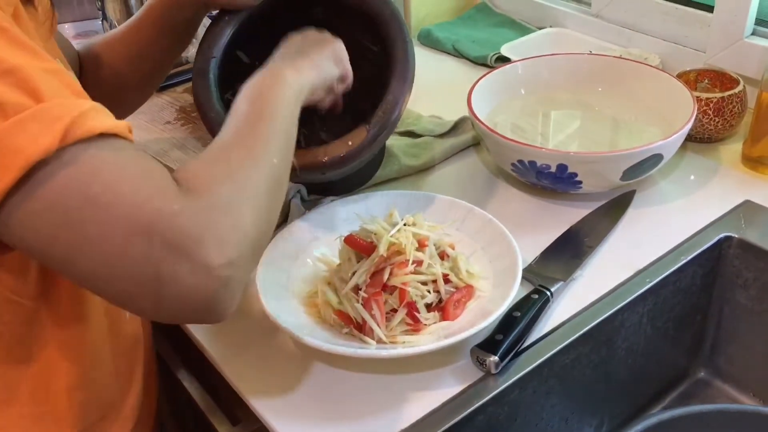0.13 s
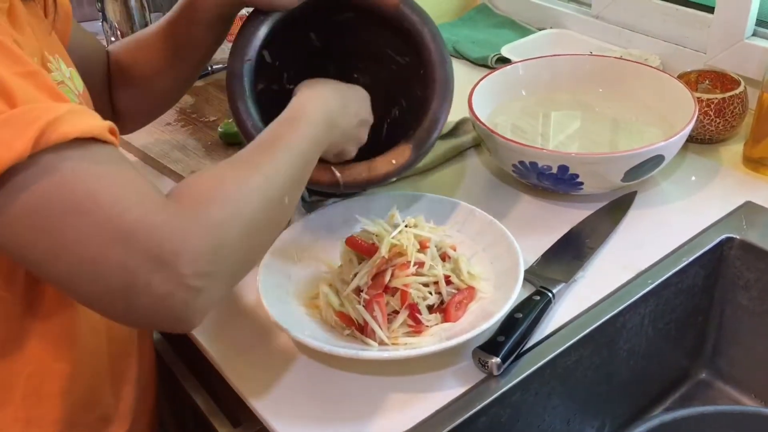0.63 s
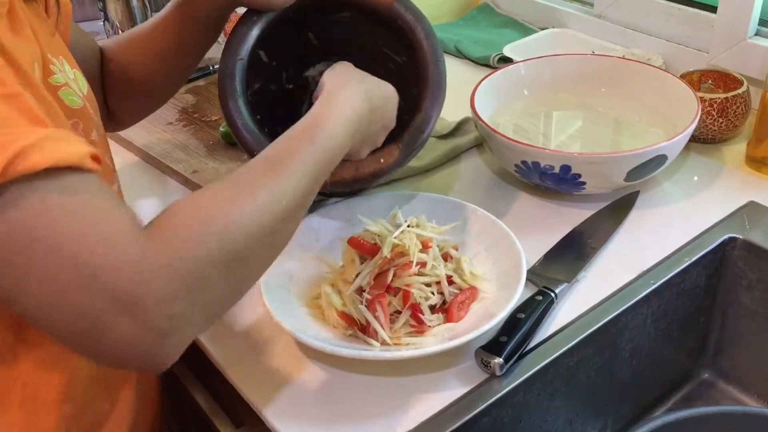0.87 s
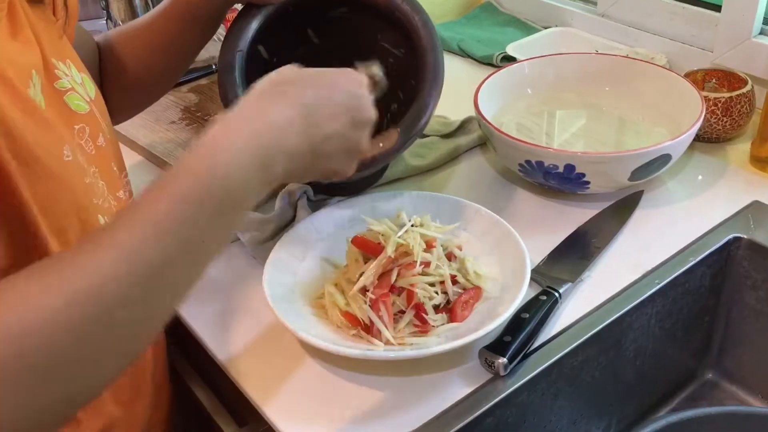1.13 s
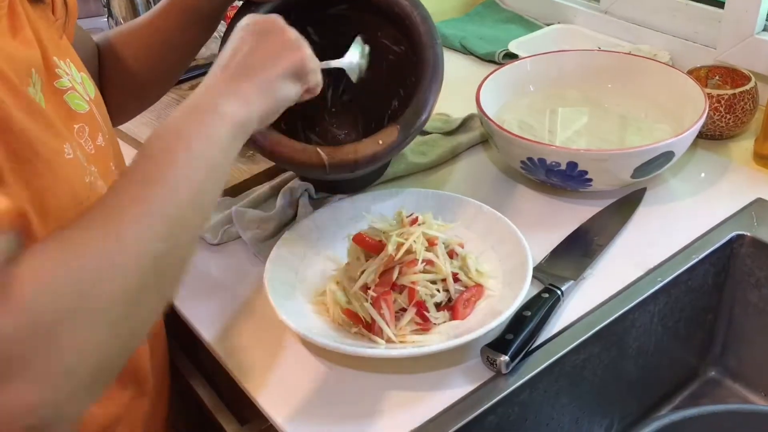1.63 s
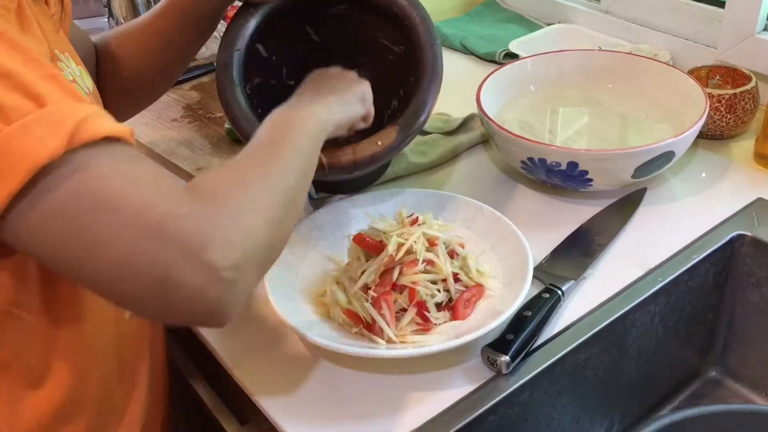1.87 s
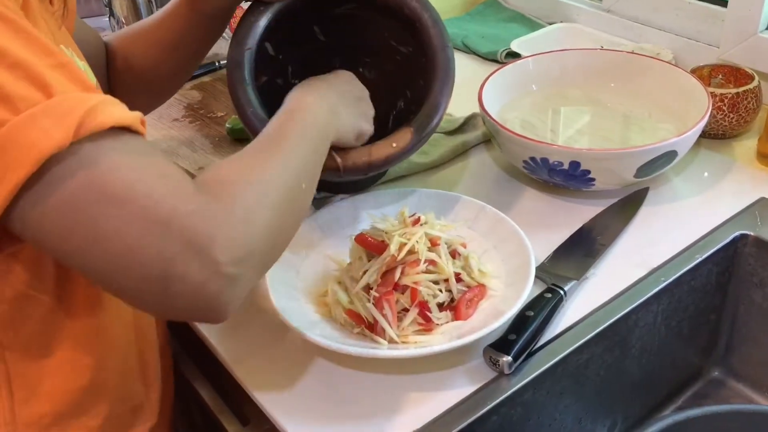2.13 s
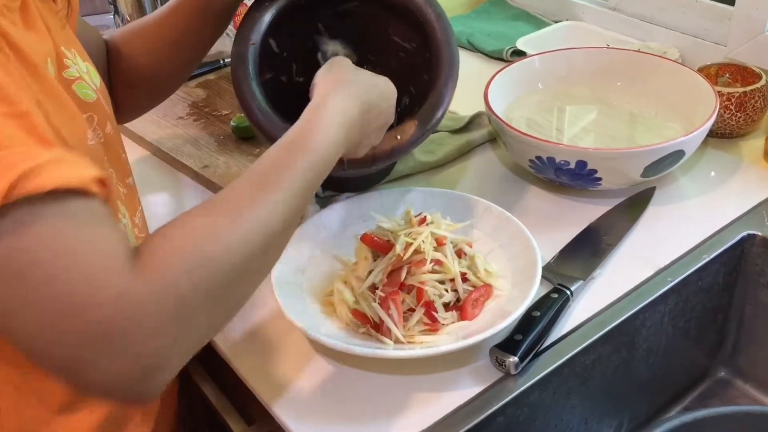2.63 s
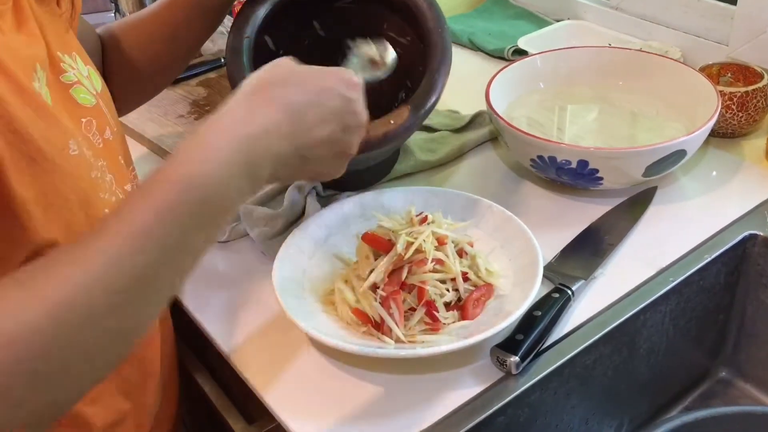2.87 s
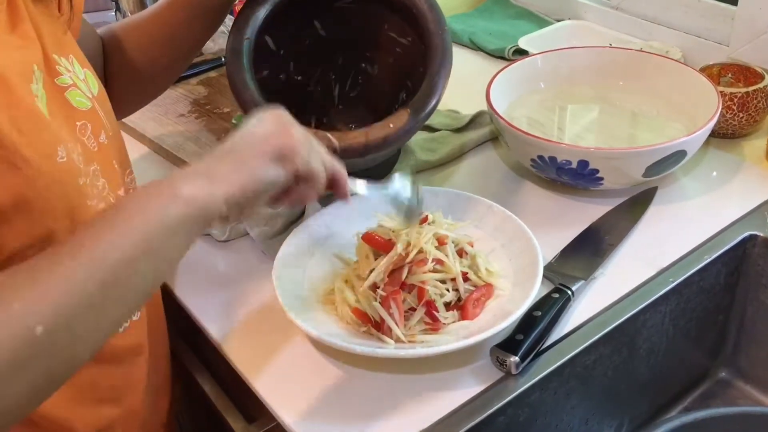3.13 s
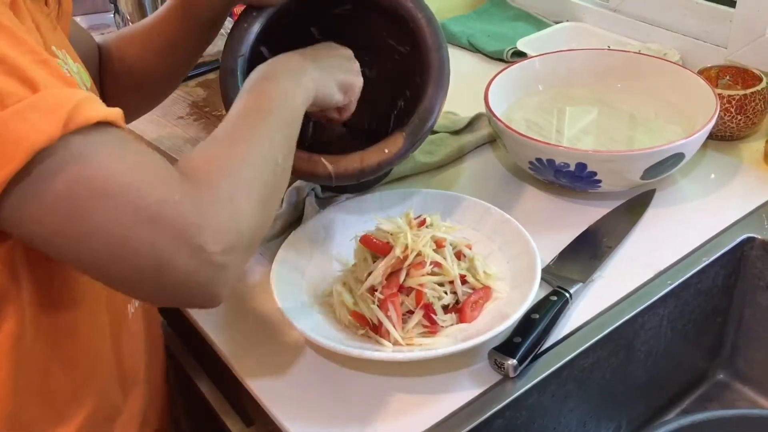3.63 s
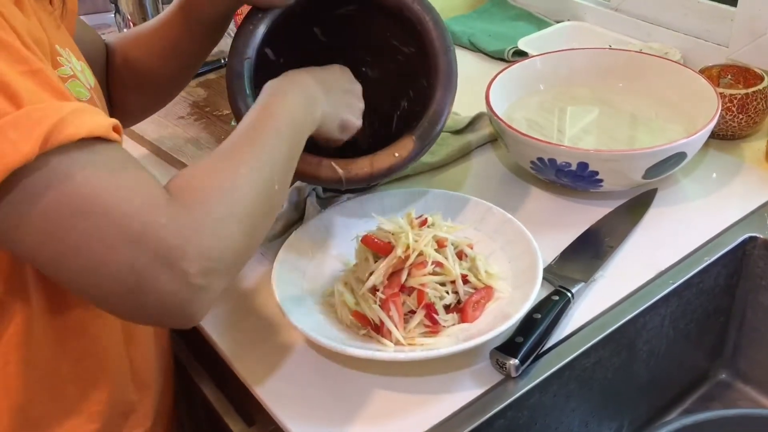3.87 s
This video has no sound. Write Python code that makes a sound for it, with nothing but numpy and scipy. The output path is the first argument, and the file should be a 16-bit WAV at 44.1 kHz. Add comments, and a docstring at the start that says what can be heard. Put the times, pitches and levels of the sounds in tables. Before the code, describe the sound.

A metal spoon rubs, then knocks and scrapes quickly inside a clay mortar, falls nearly silent, strikes brightly with more scraping, pauses, then hits hard again; small kitchen, low hum, close microphone, same in both channels.

```python
"""A metal spoon knocks against and scrapes along the wall of a clay mortar in a small quiet kitchen.
Over a steady appliance hum it first rubs, then knocks and scrapes in quick turn. After a lull come a faint rub,
a bright blow at 1.9 s with more knocks and rubbing, a pause, then a hard blow at 3.57 s and scraping up to 4 s.
Blows ring damped modes of spoon, clay and hollow; random grains ring the same modes and hiss as grit."""
import sys
import numpy as np
from scipy import signal
from scipy.fft import rfft, irfft
from scipy.io import wavfile

SR = 44100
rng = np.random.default_rng(int(sys.argv[2]) if len(sys.argv) > 2 else 0)


def volts_from_db(level):
    """Convert decibel levels to linear amplitude ratios."""
    exponent = np.asarray(level, float) / 20
    return 10 ** exponent


def transcribe(u):
    """Save the signal u as a 16-bit wav file named by the first command-line argument.

    u: samples, shape (n,) or (channels, n), limited to [-1, 1]; the rate is SR.
    q: integer samples, one column per channel.
    """
    v = np.clip(np.atleast_2d(u).T, -1, 1)
    q = np.round(v * 32767).astype(np.int16)
    wavfile.write(sys.argv[1], SR, q)


N = 176400

# Mortar modes. Each row: pitch in Hz, relative level in dB, undamped t60 in seconds.
MORTAR_MODES = [(1460, -4, 0.035), (1810, -8, 0.021), (2222, -5, 0.04), (2330, -4, 0.03), (2510, -3, .03),
                (2715, -3.5, .03), (2870, -4, 0.03), (3090, -3.5, .03), (3400, -5, .02), (3720, -1.5, 0.02),
                (4150, -6, .02), (5230, -13, .02), (6200, -7, .025)]


def rms_one(x):
    """Scale to rms 1."""
    return x / np.sqrt(np.mean(x ** 2) + 1e-20)


def cut(x, hz, kind):
    """Second-order Butterworth low-, high- or band-pass design."""
    return signal.sosfilt(signal.butter(2, hz, kind, fs=SR, output="sos"), x)


def wander(hz):
    """Chance low-passed at hz, rms 1."""
    return rms_one(cut(rng.standard_normal(N), hz, "low"))


def quiet_air():
    """Kitchen air: white noise shaped in frequency, interpolated over log pitch."""
    level_db = -57
    # Noise spectrum. Each row: frequency in Hz, relative density in dB per Hz.
    air_curve = np.array([(65, -28.5), (110, -6.5), (233, -12.5), (346, -11.5), (483, -19.5), (536, -14.5),
                          (595, -18), (674, -18), (1520, -27), (2080, -35), (7400, -45.5), (16000, -51)])
    hz = np.maximum(np.arange(N // 2 + 1) * SR / N, 1)
    shape = volts_from_db(np.interp(np.log(hz), np.log(air_curve[:, 0]), air_curve[:, 1]))
    return volts_from_db(level_db) * rms_one(irfft(rfft(rng.standard_normal(N)) * shape, N))


def appliance_hum():
    """Appliance tones: narrow bands of noise, their level swings compressed to the square root."""
    # Each row: pitch in Hz, level in dB rms, full width at half amplitude in Hz.
    hum_rows = [(49.6, -54, 17), (61.2, -52, 0.38), (83.9, -62.5, 9), (98, -58, 7.9), (294, -64, 19),
                (345.4, -67.5, 4.2), (1535, -74, 3.22), (7320, -89, 36)]
    hz = np.maximum(np.arange(N // 2 + 1) * SR / N, 1)
    out = np.zeros(N)
    for tone_hz, db, width_hz in hum_rows:
        line = 1 / (1 + ((hz - tone_hz) / width_hz * 2) ** 2)
        analytic = signal.hilbert(irfft(rfft(rng.standard_normal(N)) * line, N))
        out += volts_from_db(db) * rms_one(np.imag(analytic) / np.abs(analytic) ** 0.5)
    return out


def kitchen(x):
    """Diffuse room tail: dying noise, the treble dying sooner."""
    tail_db, split_hz, rise_s = -14, 2730, 0.005
    low_t60_s, high_t60_s, high_db = 0.48, 0.22, -5.5
    t = np.arange(SR * 3 // 4) / SR
    noise = rng.standard_normal((2, len(t)))
    low = cut(noise[0], split_hz, "low") * volts_from_db(-60 * t / low_t60_s)
    high = cut(noise[1], split_hz, "high") * volts_from_db(high_db - 60 * t / high_t60_s)
    tail = (low + high) * np.clip(t / rise_s, 0, 1) ** 2
    return volts_from_db(tail_db) * signal.fftconvolve(x, tail / np.sqrt(np.sum(tail ** 2)))[:N]


def wall_ring():
    """A close pair of wall modes in opposite phase: the tone swells, dips and returns fainter."""
    ring_hz, split_hz, t60_s = 1168, 8.8, 0.34
    # Each row: start in seconds, level in dB before beat and decay.
    ring_rows = [(0.0, -53), (1.89, -44), (3.565, -25)]
    out = np.zeros(N)
    for s, db in ring_rows:
        t = np.maximum(np.arange(N) / SR - s, 0)
        beat = np.sin(np.pi * split_hz * t)
        out += volts_from_db(db - 60 * t / t60_s) * np.sin(2 * np.pi * ring_hz * t) * beat
    return out


def singing():
    """Single modes of spoon or mortar left free: sines dying away, fluttering under the grip."""
    flutter_depth_db, flutter_hz = 3.5, 45
    # Each row: start in seconds, pitch in Hz, starting level in dB before flutter, t60 in seconds.
    sing_rows = np.array([(0.0, 2130, -57.5, 0.4), (0.0, 3060, -53.5, 0.27), (0.0, 3390, -54, 0.22),
                          (.206, 3388, -44.5, 0.78), (1.8945, 3403, -24, 0.15), (2.156, 2830, -35, 0.12),
                          (2.156, 2340, -52, .25), (3.5655, 4963, -32.5, 0.2), (3.5655, 7200, -28, 0.11)])
    s, hz, db, t60 = sing_rows.T[:, :, None]
    t = np.maximum(np.arange(N) / SR - s, 0)
    flutter_db = flutter_depth_db * np.array([wander(flutter_hz) for _ in sing_rows])
    return np.sum(volts_from_db(db + flutter_db - 60 * t / t60) * np.sin(2 * np.pi * hz * t), axis=0)


def squeaks():
    """The edge catches and one band of spoon or hollow swells: narrow noise under a half-sine."""
    width = 0.07  # share of the pitch
    # Each row: start in seconds, length in seconds, pitch in Hz, level in dB rms before the swell.
    squeak_rows = [(0.221, .018, 5620, -41), (0.276, 0.028, 4670, -39.5), (.297, 0.036, 6070, -36.5),
                   (0.495, 0.034, 555, -47), (2.095, .12, 495, -51), (0.667, 0.048, 7060, -60),
                   (1.962, 0.041, 6250, -46), (3.7, 0.035, 9600, -47), (3.728, 0.035, 5970, -40.5),
                   (3.941, 0.013, 6130, -43.5)]
    out = np.zeros(N)
    for s, length_s, hz, db in squeak_rows:
        noise = rng.standard_normal(SR // 5)
        swell = np.sin(np.pi * np.clip(np.arange(len(noise)) / SR / length_s, 0, 1))
        band = cut(noise, [hz * (1 - width / 2), hz * (1 + width / 2)], "band")
        wave = volts_from_db(db) * swell * rms_one(band)
        start = int(s * SR)
        out[start:start + len(noise)] += wave[:N - start]
    return out


def spoon_modes():
    """Spoon modes as rows of pitch in Hz, relative level in dB, undamped t60 in seconds."""
    # One pitch in Hz per mode.
    spoon_pitches_hz = [3230, 3385, 3505, 3750, 4000, 4500, 4680, 4963, 5730, 5912, 6130, 6610, 7100, 8200,
                        8825, 9200, 10100, 11700, 12730, 13540, 14310, 15200]
    # Each row: relative level in dB, undamped t60 in seconds.
    spoon_decays = [(-1.5, 0.035), (6, 0.054), (-3.5, 0.076), (-3.5, 0.062), (-3.5, 0.029), (-6, 0.081),
                    (-16, .08), (-13.5, .16), (-4, .07), (-2.5, 0.079), (-5, 0.092), (-7.5, 0.12),
                    (-11, 0.044), (-14, 0.046), (-4, 0.076), (-5.5, 0.049), (-26.5, 0.018), (-20, 0.025),
                    (-3, 0.056), (-13.5, 0.046), (-10.5, 0.033), (-18, .04)]
    return [(hz, db, t60) for hz, (db, t60) in zip(spoon_pitches_hz, spoon_decays)]


def rubbed(modes, low, high, damping, grains, shift_percent):
    """Grains into one group's resonators, each drifting in pitch and fading on its own; rms 1."""
    pitch_wander_percent, pitch_wander_hz = 0.45, 10  # contact and grip pull the modes about
    level_wander_db, level_wander_hz = 5, 12
    treble_damp_hz = 10000  # above this a mode broadens fast
    out = 0
    for hz, db, t60 in modes:
        if low <= hz < high:
            bend = 1 + (shift_percent + pitch_wander_percent * wander(pitch_wander_hz)) / 100
            turn = np.exp(2j * np.pi * hz / SR * np.cumsum(bend))
            r = volts_from_db(-60 * (1 + (hz / treble_damp_hz) ** 2) / (t60 * damping * SR))
            push = grains * volts_from_db(db + level_wander_db * wander(level_wander_hz))
            # one-pole decay in a frame turning at the mode's pitch
            out = out + np.real(turn * signal.lfilter([1], [1, -r], push / turn + 1e-18))
    return rms_one(out)


def rub_grains():
    """Sparse random impulses of uneven size with a slight level flutter."""
    grains_per_s, flutter_db, flutter_hz = 5500, 0.5, 61.4
    hits = rng.random(N) < grains_per_s / SR
    return volts_from_db(flutter_db * wander(flutter_hz)) * hits * rng.standard_normal(N)


def rubbing():
    """Dense grains under each stroke excite the modes of both bodies and hiss as grit."""
    touch_s, lift_s = 0.006, 0.003  # fade in and out of a stroke
    spoon_damping = 0.6  # share of the spoon's t60 left in contact
    # One list per stroke; the point of contact decides which groups speak. Each row: time in seconds,
    # spoon level in dB in four groups low to high, mortar level in dB in two groups low to high.
    stroke_rows = [
        [(0.0, -40, -42, -68, -58, -40, -33), (0.012, -49.5, -55, -60, -66, -64, -57),
         (0.116, -68, -69.5, -69, -78, -67, -64), (0.156, -69, -74, -80, -87, -73, -89),
         (0.194, -77, -75, -63, -77, -72, -86), (0.196, -67, -64, -47, -63, -67.5, -79)],
        [(0.203, -40, -41.5, -30.5, -44, -53, -67), (0.234, -44.5, -38, -49, -41, -69, -70),
         (0.248, -44, -65, -43, -62, -69, -72), (0.272, -48, -50, -48, -51, -68, -73),
         (0.284, -38, -39, -40.5, -42, -60, -66), (0.292, -46, -46, -40, -55, -63, -67),
         (0.314, -36, -40, -55, -50, -54, -53), (0.334, -60, -79, -48, -50, -53, -57),
         (0.338, -47, -51, -61.5, -57, -55, -65)],
        [(0.355, -43, -37, -63.5, -63, -56, -60), (0.366, -45, -54, -68, -71, -76, -47.5),
         (0.434, -57, -60.5, -85, -85, -91, -55.5), (0.468, -60, -64, -85, -76, -63, -67),
         (0.476, -53.5, -65, -57, -69, -57, -59), (0.492, -53, -60, -63, -65, -64, -57),
         (0.518, -36, -51, -38, -52, -44, -44.5), (0.521, -50, -46, -57.5, -47.5, -45, -35)],
        [(0.53, -41, -57, -48, -50, -40, -28), (0.549, -51, -61, -58, -70, -68, -40.5),
         (0.591, -54, -65, -59, -64, -80, -47), (0.633, -59, -69, -72, -81, -79, -56),
         (0.663, -70, -70, -86.5, -75, -82, -57), (0.683, -60, -60, -63.5, -68, -85, -59),
         (0.761, -75, -70.5, -67, -76, -86, -70.5), (0.83, -76, -76, -77, -79, -92, -78)],
        [(1.364, -83, -83.5, -73, -80, -85, -79), (1.414, -95, -84, -99, -87, -81, -92),
         (1.428, -84, -79, -71, -76, -89, -88), (1.46, -95.5, -96, -87, -94.5, -71, -84)],
        [(1.9, -29, -24, -40, -45, -39, -50), (1.922, -39, -37, -40, -50, -50, -53),
         (1.938, -35.5, -41, -44, -53, -60, -47), (1.972, -36.5, -35.5, -41.5, -52, -48.5, -50),
         (1.994, -46, -53, -54, -63, -58, -55), (2.02, -45, -50, -61, -70, -62, -80),
         (2.032, -53, -50, -65, -68, -60, -47), (2.04, -46, -49, -59, -56, -63, -58)],
        [(2.07, -40, -49, -62, -61, -41, -47), (2.076, -53, -60, -68, -71, -60, -50),
         (2.134, -60, -62, -76, -75, -64, -57.5), (2.148, -53, -52, -52, -61, -57, -55),
         (2.17, -50.5, -64, -53, -52, -42.5, -42), (2.24, -62, -64, -66, -70, -88, -57),
         (2.29, -68, -70, -71, -74, -62, -63.5), (2.36, -85, -87, -91, -88, -89, -70.5)],
        [(2.37, -79, -77, -80, -75.5, -73.5, -74), (2.428, -78, -80, -75, -78, -83, -77),
         (2.458, -74, -71, -67, -65, -83, -70), (2.474, -80, -73, -66, -65, -82, -79),
         (2.494, -75, -72, -73, -75, -82, -84), (2.53, -80, -77, -72, -71, -84, -88),
         (2.57, -85.5, -90.5, -91, -88, -78.5, -86)],
        [(3.58, -38, -41, -31, -53, -32, -36), (3.597, -38, -36, -40, -51, -53, -46.5),
         (3.689, -44, -49, -50.5, -60, -56, -53), (3.701, -59, -46, -48, -46, -50, -49),
         (3.725, -41.5, -45, -51, -59, -62.5, -59.5), (3.867, -63, -65, -71, -79, -65.5, -65),
         (3.893, -59, -60, -76, -59, -59, -64), (3.933, -62, -75, -68, -80, -68, -65),
         (3.94, -55, -58, -63, -62, -58, -61)],
        [(3.955, -49, -62, -62, -64.5, -37, -42), (3.969, -46, -62, -51, -56, -38.5, -41),
         (3.975, -55, -57, -49, -58, -40, -42), (3.991, -44, -69, -50, -41, -35.5, -32.5),
         (4.0, -48, -48, -51, -48, -37, -40)],
    ]
    # Toneless grit against ringing spoon modes, in dB per stroke.
    spoon_grit_db = [-13, -14, -18, 4, 4, -8.5, 1, -1.5, -4.5, 7]
    # Hiss of the clay against its modes, in dB per stroke.
    clay_hiss_db = [7, -7, 9, 18, .1, 2.5, -5, 6, 1, -6.5]
    # Shift of the mortar modes by pressure on the wall, in percent per stroke.
    wall_shift_percent = [-3, 0.74, -2.9, -2, -0.8, 2.7, -1.4, .1, 1.6, 3.1]
    # Edges of the spoon's mode groups, in Hz.
    spoon_edges_hz = [3200, 5200, 7600, 11000, 16000]
    # Edges of the mortar's mode groups, in Hz.
    mortar_edges_hz = [1250, 2050, 3250]

    time = np.arange(N) / SR
    push = np.zeros((6, N))
    spoon_share, clay_share, shift = np.ones(N), np.ones(N), np.zeros(N)
    for rows, grit_db, clay_db, percent in zip(stroke_rows, spoon_grit_db, clay_hiss_db, wall_shift_percent):
        s, *levels_db = np.transpose(rows)
        on = (time >= s[0]) & (time <= s[-1])
        fade = np.clip(np.minimum((time[on] - s[0]) / touch_s, (s[-1] - time[on]) / lift_s), 0, 1)
        push[:, on] = volts_from_db(np.array([np.interp(time[on], s, db) for db in levels_db])) * fade
        spoon_share[on], clay_share[on], shift[on] = volts_from_db(grit_db), volts_from_db(clay_db), percent

    grains = rub_grains()
    grit = rms_one(grains) + rng.standard_normal(N)
    groups = [(spoon_modes(), low, high, spoon_damping, spoon_share, 0)
              for low, high in zip(spoon_edges_hz, spoon_edges_hz[1:])]
    groups += [(MORTAR_MODES, low, high, 1, clay_share, shift)
               for low, high in zip(mortar_edges_hz, mortar_edges_hz[1:])]
    out = np.zeros(N)
    for level, (modes, low, high, damping, share, moved) in zip(push, groups):
        hiss = rms_one(cut(cut(grit, [low, high], "band"), low, "high"))
        tones = cut(rubbed(modes, low, high, damping, grains, moved), low * 0.9, "high")
        out += level * (tones + share * hiss) / np.sqrt(1 + share ** 2)
    return out


def struck(modes, t, tilt_db, damping, chance):
    """Damped sines of one body after a blow, scaled by their summed power; chance varies each mode."""
    pivot_hz, scatter_db, detune_percent = 6000, 2, 0.6
    hz, db, t60 = np.array(modes).T[:, :, None]
    count = len(hz)
    start_db = db + tilt_db * np.log2(hz / pivot_hz) + scatter_db * chance[:count, None]
    gain = volts_from_db(start_db - 60 * t / (t60 * damping))
    hz = hz * (1 + detune_percent / 100 * chance[count:2 * count, None])
    sign = np.sign(chance[::-1][:count, None])
    wave = np.sum(gain * np.sin(2 * np.pi * hz * t) * sign, axis=0)
    return wave / np.sqrt(2 * np.sum(gain[:, 0] ** 2))


def crack(t):
    """Short bright crack of a blow: dying noise, band-passed."""
    level_db, t60_s, low_hz, high_hz = -10, 0.05, 3007, 10800
    noise = rng.standard_normal(len(t)) * volts_from_db(level_db - 60 * t / t60_s)
    return cut(cut(noise, [low_hz, high_hz], "band"), low_hz, "high")


def knock(t):
    """Dry click of clay: very short dying noise, band-passed."""
    level_db, t60_s, low_hz, high_hz = 0.5, 0.0029, 1282, 4900
    return cut(rng.standard_normal(len(t)) * volts_from_db(level_db - 60 * t / t60_s), [low_hz, high_hz], "band")


def blows():
    """Each blow: a crack and spoon modes, a click and mortar modes, the thump of the hollow."""
    contact_s, thump_rise_s = 0.00025, 0.0014
    clay_held = 0.3  # share of the mortar's t60 left by the steadying hand
    thump_held = 0.67  # share of the hollow's t60
    # Each row: start in seconds, spoon level in dB, mortar level in dB, spoon brightness in dB per octave,
    # hollow thump level in dB, share of the spoon's t60 left by the grip.
    blow_rows = [(0.2015, -23.5, -68, 12, -63, 0.39), (0.3464, -27, -11.5, -12, -29.5, 0.37),
                 (0.493, -37.5, -43, 7, -43, 0.41), (0.526, -23.5, -11, -5, -33.5, 0.33),
                 (1.8939, -5, -20.5, 6, -44.5, 0.2), (2.015, -38, -51, -9, -42.5, 0.26),
                 (2.0428, -26.5, -55, 3, -55, 0.49), (2.0615, -26.5, -24.5, 5, -27.5, 0.27),
                 (2.1476, -40, -58, 2.5, -44, 0.27), (2.156, -31, -20.5, 13, -34.5, 0.35),
                 (3.5652, -2.5, -25.5, -0.5, -26, 0.57), (3.7024, -28, -47, 5, -40.5, 0.26),
                 (3.896, -37, -33, 1, -46, 0.31), (3.9453, -33.5, -29.5, 4, -38.5, 0.61)]
    # How strongly each blow wakes the belly modes of the mortar, in dB.
    belly_gains_db = [5, -3.5, .1, 11, -1.5, .1, -2, -8, 5, 2, -15, 9, 0, -7]
    # Lower and upper limit of the belly modes, in Hz.
    belly_limits_hz = [2050, 3250]
    # Air and body of the hollow. Each row: pitch in Hz, relative level in dB, undamped t60 in seconds.
    thump_modes = [(495, -1, 0.09), (549.7, -2.5, 0.09), (865, -7, 0.069)]

    t = np.arange(SR // 2) / SR
    contact = (1 - np.exp(-t / contact_s)) ** 2
    thump_rise = 1 - np.exp(-t / thump_rise_s)
    out = np.zeros(N + len(t))
    for (s, spoon_db, mortar_db, tilt_db, thump_db, grip), belly_db in zip(blow_rows, belly_gains_db):
        chance = rng.standard_normal((2, 48))
        clay = [(hz, db + belly_db * (min(belly_limits_hz) < hz < max(belly_limits_hz)), t60)
                for hz, db, t60 in MORTAR_MODES]
        spoon = struck(spoon_modes(), t, tilt_db, grip, chance[0]) + crack(t)
        mortar = struck(clay, t, 0, clay_held, chance[1]) + knock(t)
        thump = struck(thump_modes, t, 0, thump_held, chance[1, ::-1]) * thump_rise
        start = int(s * SR)
        out[start:start + len(t)] += volts_from_db(spoon_db) * spoon * contact
        out[start:start + len(t)] += volts_from_db(mortar_db) * mortar + volts_from_db(thump_db) * thump
    return out[:N]


def scene():
    """Spoon work, its room tail, free rings and the background, alike in both channels."""
    background = quiet_air() + appliance_hum()
    work = blows() + rubbing() + squeaks()
    return np.tile(work + kitchen(work) + singing() + wall_ring() + background, (2, 1))


def roll_off(x):
    """The treble ends steeply here."""
    return signal.sosfilt(signal.butter(12, 16810, fs=SR, output="sos"), x)


def record(dry):
    """The microphone loses the deepest bass; a steep low-pass cuts the top."""
    mic_low_hz, top_hz = 30.02, 16800
    mic = cut(cut(dry, mic_low_hz, "high"), mic_low_hz, "high")
    low_pass = signal.cheby2(12, 60, top_hz, fs=SR, output="sos")
    return roll_off(signal.sosfilt(low_pass, mic))


dry = scene()
out = record(dry)
transcribe(out)
```